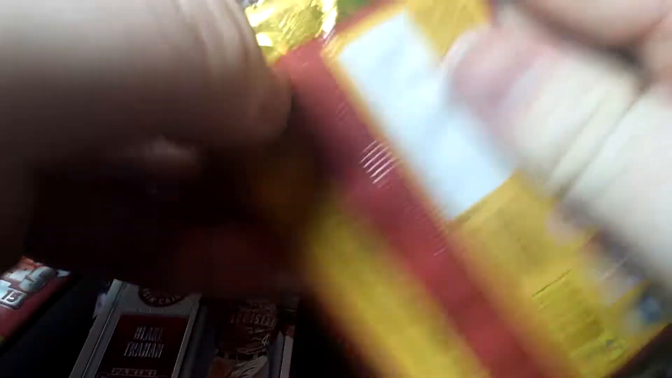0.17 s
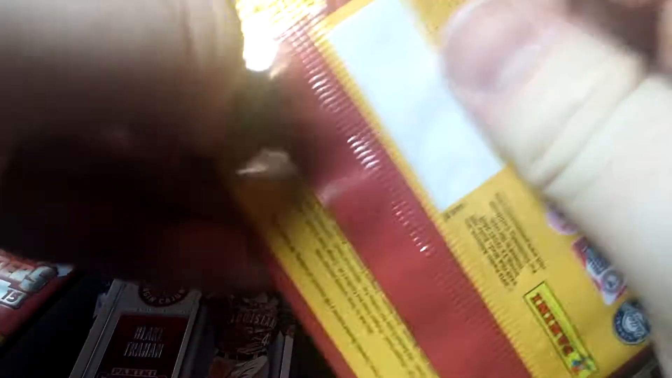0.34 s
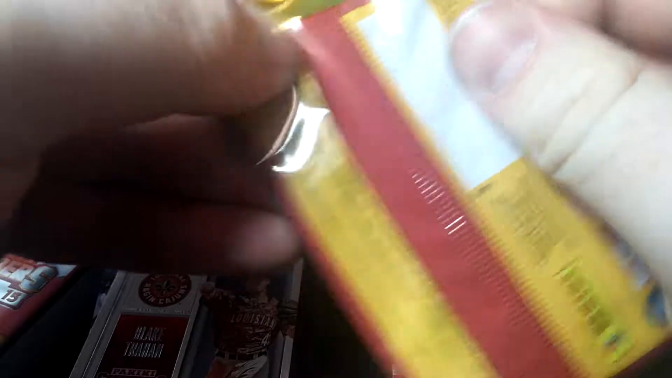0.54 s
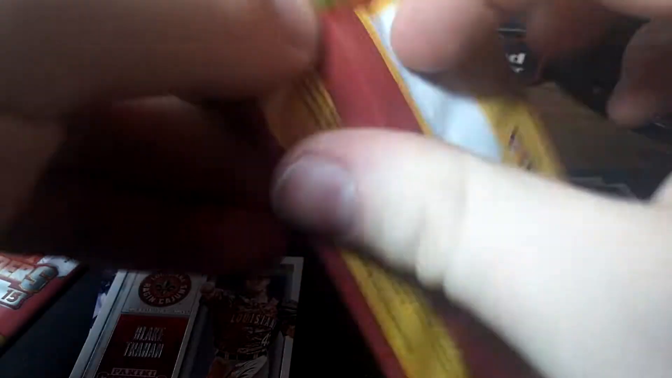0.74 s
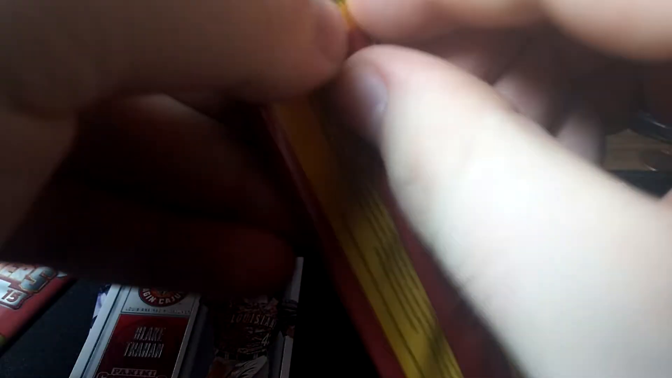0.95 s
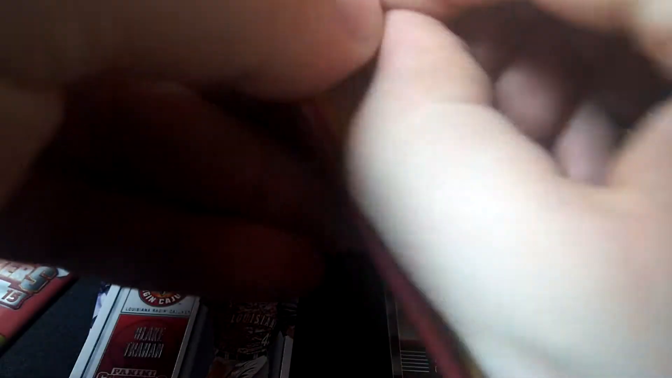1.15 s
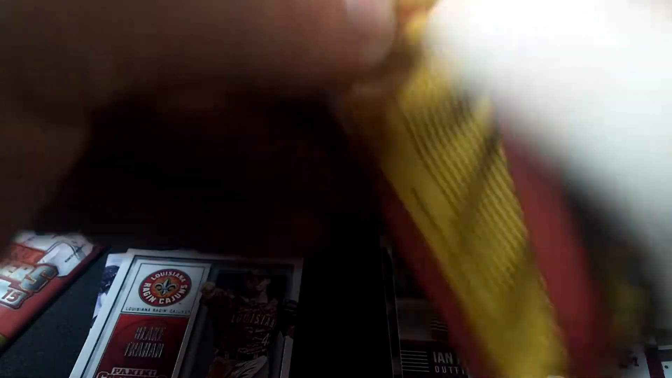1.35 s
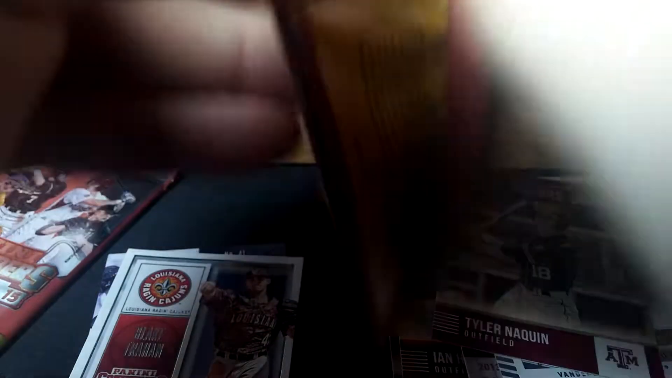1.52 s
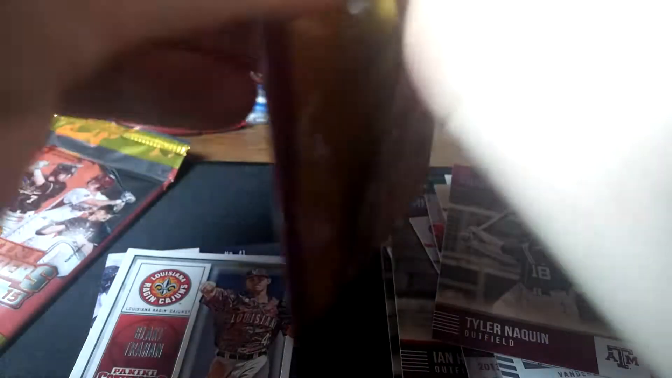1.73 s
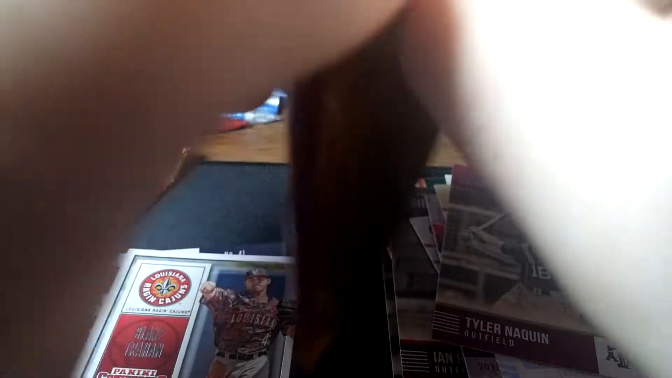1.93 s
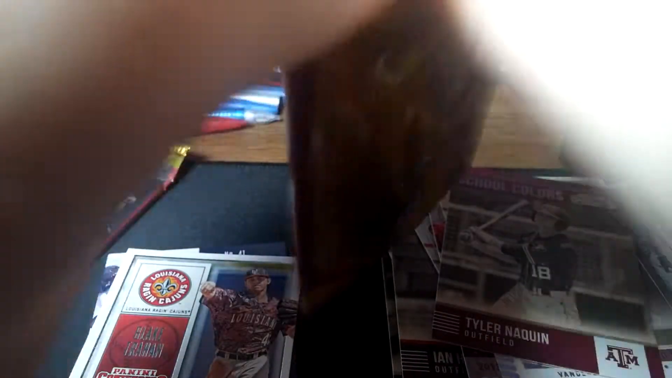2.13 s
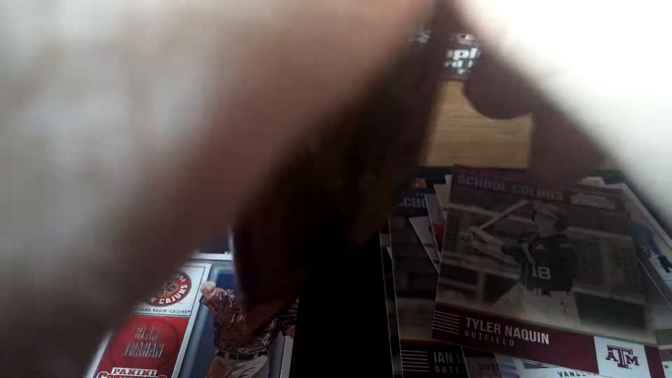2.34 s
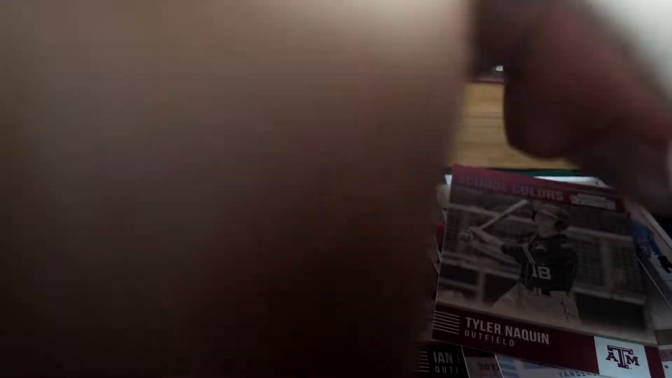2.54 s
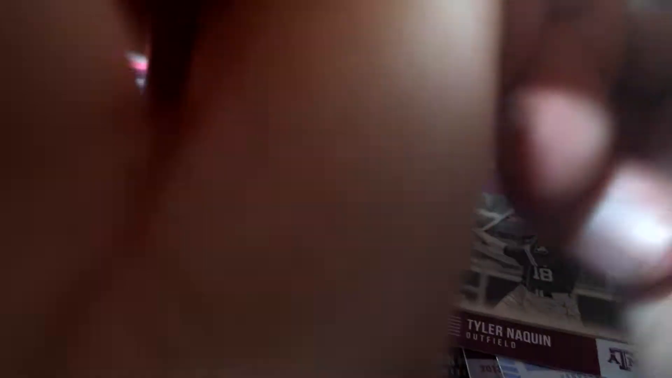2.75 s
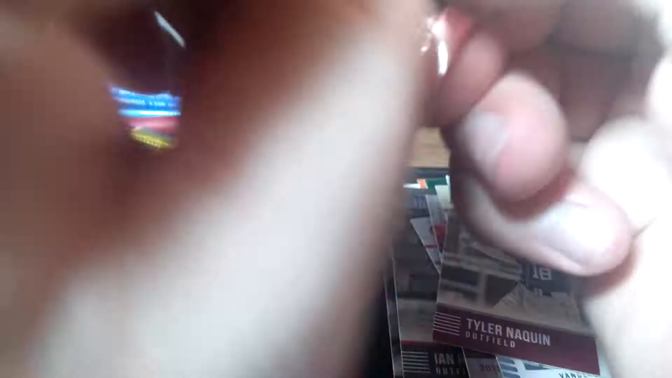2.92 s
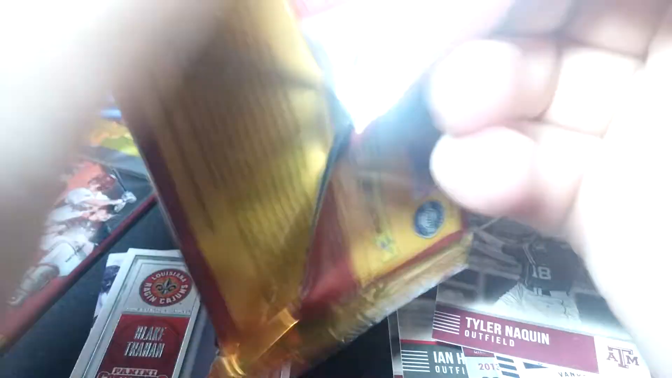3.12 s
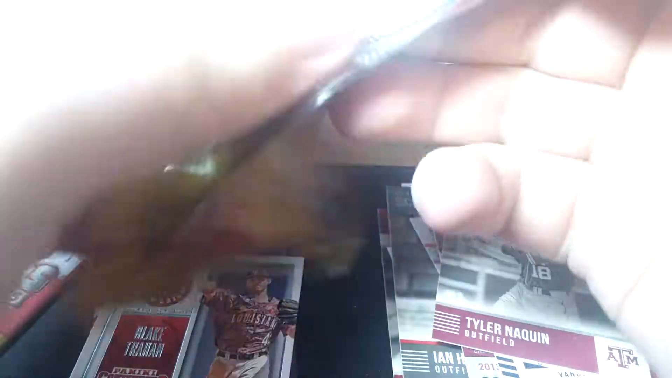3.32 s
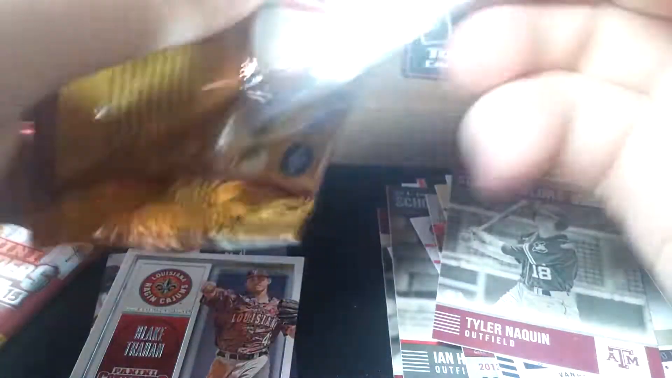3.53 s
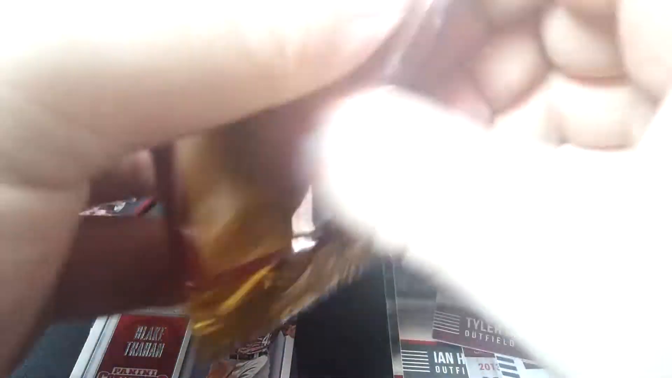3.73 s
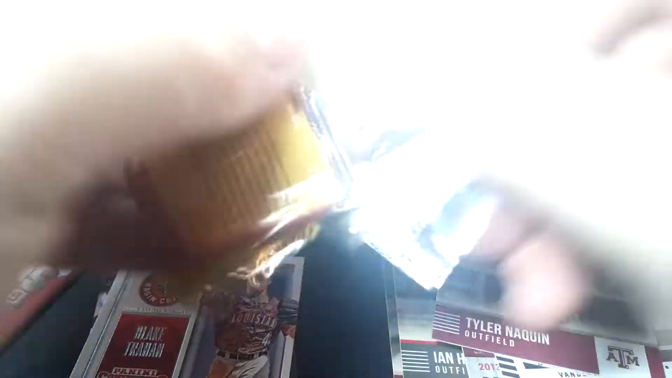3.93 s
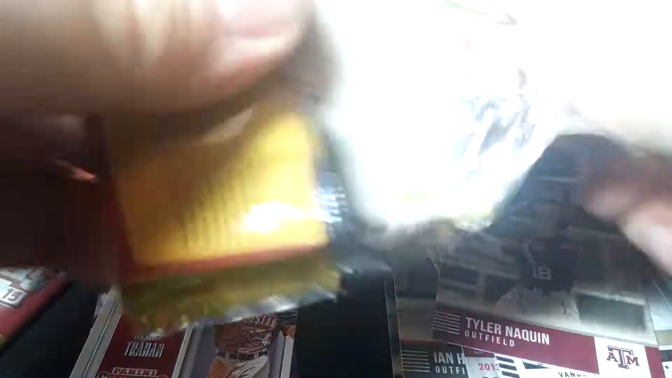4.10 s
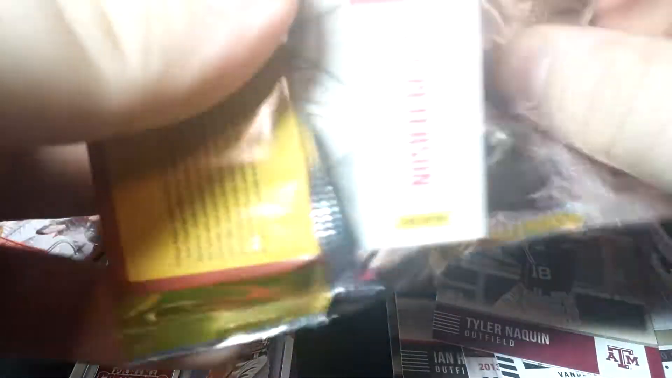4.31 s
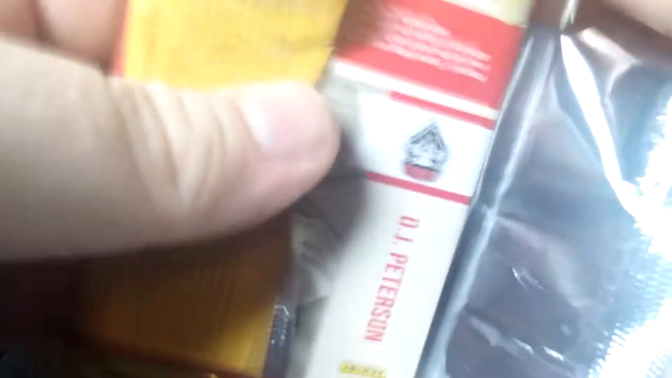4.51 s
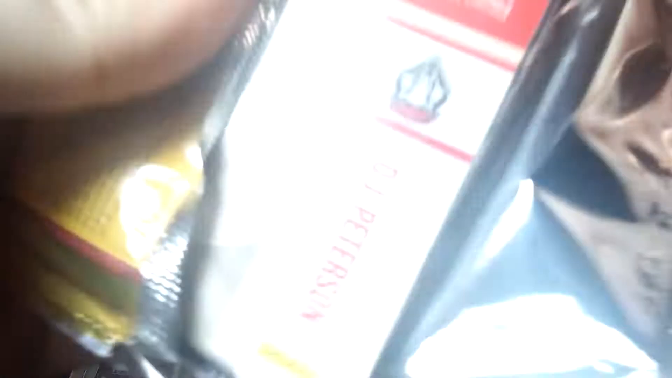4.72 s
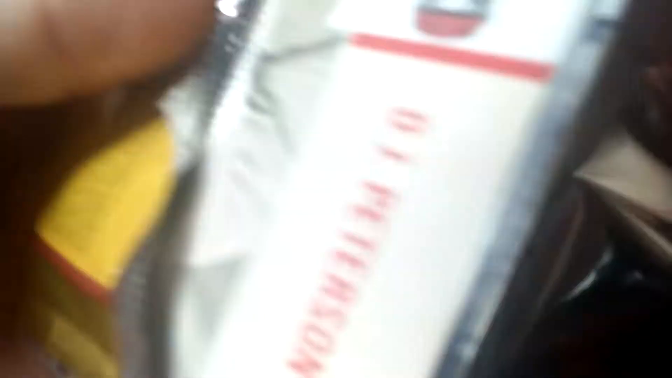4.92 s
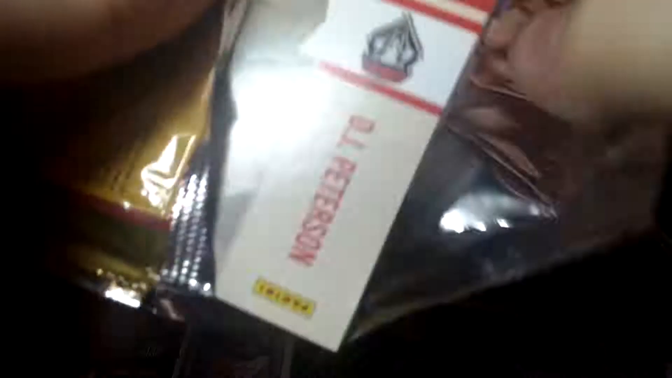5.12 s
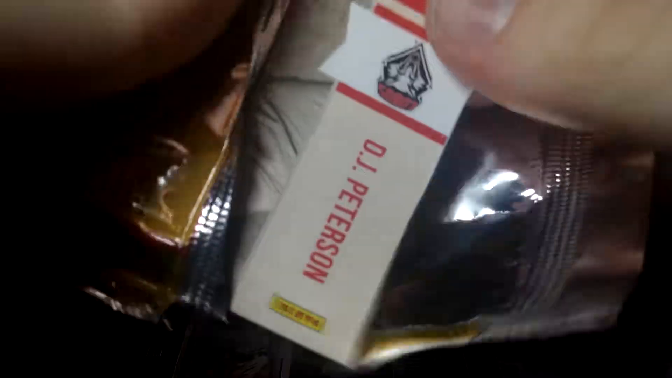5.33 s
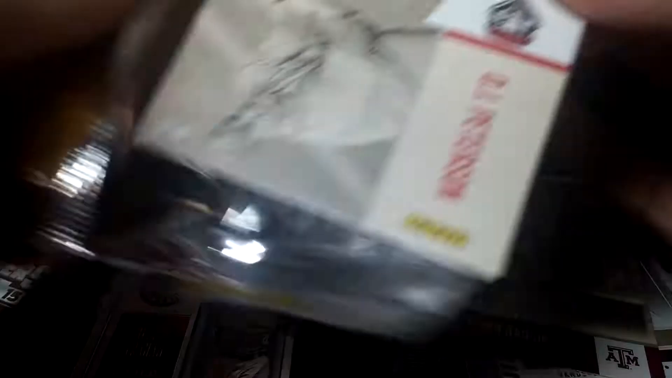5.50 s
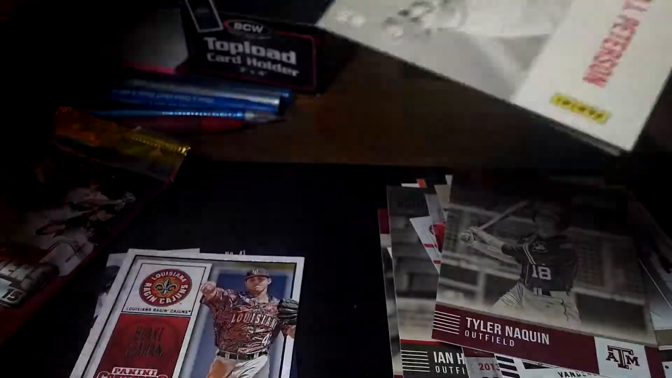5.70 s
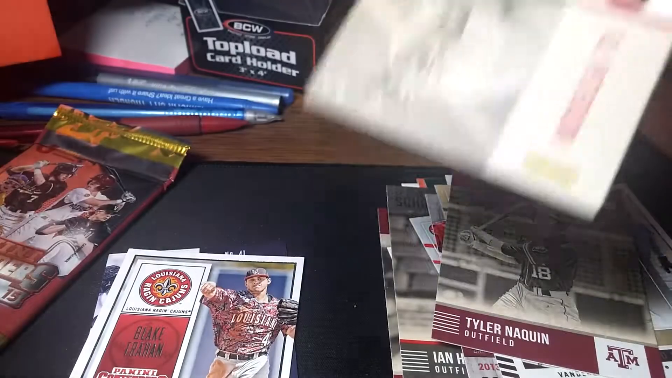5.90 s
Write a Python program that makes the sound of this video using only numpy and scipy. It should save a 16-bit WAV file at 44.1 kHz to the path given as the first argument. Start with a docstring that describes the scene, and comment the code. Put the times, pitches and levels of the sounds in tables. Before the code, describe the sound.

Close to the microphone, fingers pinch a foil card packet with single quiet ticks and thin rustle. Small rasps and dull bumps follow, a hard snap comes halfway, then a dense burst of ripping and crackling, loudest around four seconds. The open pouch sounds fuller as cards are worked out with low rubbing, then the foil quiets down in a small, fairly dry room with faint hum.

```python
"""A foil card pack is pinched, ripped open and peeled off its cards, close by, over a desk in a small room.
First come creases snapping singly (ringing noise bursts) and thin rustle (showers of tiny buckles).
From 1.3 s tears crowd the showers into a rasp; from 1.6 s fingers and cards bump the pack (low rings, thuds).
From 3.4 s the pouch gapes and booms; fingers drag hardest near 4.7 s (low noise), then the foil settles.
Sliding skin and card add rough noise in four strokes; shaped noise hums faintly as the room throughout."""
import sys
import numpy as np
from scipy import signal
from scipy.fft import rfft, irfft
from scipy.io import wavfile

SR = 44100
rng = np.random.default_rng(int(sys.argv[2]) if len(sys.argv) > 2 else 0)


def transcribe(u):
    """Save the signal u as a 16-bit wav file named by the first command-line argument.

    u: samples, shape (n,) or (channels, n), limited to [-1, 1]; the rate is SR.
    q: integer samples, one column per channel.
    """
    v = np.clip(np.atleast_2d(u).T, -1, 1)
    q = np.round(v * 32767).astype(np.int16)
    wavfile.write(sys.argv[1], SR, q)


N = 267111
TIME = np.arange(N) / SR

# loud buckles: start_s, crack_level_db, body_above_crack_db, fizz_above_crack_db, facet_ring_hz
SNAP_EVENTS = [(0.0146, -46, -22, 18, 4550), (0.138, -42, -10, 3.5, 5870.0), (0.2907, -46.5, -5, 5.5, 5540),
               (0.31, -41, -26, 9, 4350), (0.358, -52, -17, 3, 6000.0), (0.628, -38, -11.5, 2, 3750),
               (0.6734, -38, -4.5, 11.5, 5850.0), (0.711, -42, -9, 6, 4530),
               (0.8008, -38, -13.5, 10.5, 9500), (0.9872, -53, -8, 5, 3440), (1.0518, -53, 0, 6.5, 3870),
               (1.182, -56.5, 3, 20, 4720), (1.2387, -52, -12, 19.5, 3780), (1.2764, -41.5, -5, 8.5, 8600),
               (1.3102, -44, -5, 12, 3830), (1.3689, -31.5, -14, -3, 3950), (1.4244, -32, -18.5, 3, 3500),
               (1.4932, -40, -8.5, -2.5, 1980), (1.5772, -36.5, -12.5, -8.5, 3030),
               (1.6056, -28.5, -20, 2.5, 3340), (1.719, -46, -5, -2.5, 1740), (1.8084, -53, 1, 7, 6800),
               (1.9282, -41.5, -15, 3, 3530), (1.9594, -41, -8, 4.5, 9200), (2.001, -43, -13, 3, 4740.0),
               (2.0335, -47.5, -18, 14.5, 4730), (2.0811, -45, -17, 5, 6100), (2.1164, -50, -8, 7.5, 4370),
               (2.214, -46, -17, 10, 5400), (2.234, -43, -22, 2, 4550.0), (2.3114, -39.5, -15, 12, 6250),
               (2.368, -41.5, -13.5, -3, 3870.0), (2.4699, -36, -17, 10, 4300),
               (2.594, -37.5, -11, 4.5, 6640), (2.6242, -30, -11.5, 3, 6850),
               (2.7026, -36.5, -21, 3.5, 4480), (2.7972, -40.5, -7, 9, 4340),
               (2.8916, -17.5, -15.5, 0.5, 4070), (3.029, -32.5, -16, 7.5, 4700),
               (3.1134, -24, -11, -2, 2110), (3.1499, -31.5, -14, 6, 3240), (3.1815, -26, -10, 0, 1480),
               (3.2121, -20.5, -11.5, 0, 1840), (3.2555, -26, -24, -5, 2620),
               (3.3141, -35.5, 3, 1.5, 5880.0), (3.3792, -28, -2.5, 2.5, 6580), (3.4435, -35, -2, 14, 6300),
               (3.5098, -26, 1.5, 9.5, 5300), (3.536, -34, -12, 9, 4300), (3.5986, -34, -3, 4.5, 2800),
               (3.697, -37.5, -5, -8, 1460.0), (3.7256, -39.5, -3, 8.5, 5600), (3.7936, -34, -19, 6, 9850),
               (3.8161, -31, -11, 6, 4360), (3.953, -22, -7.5, -1.5, 2840), (3.9929, -27, -16, 6, 8690.0),
               (4.0567, -13, -16, -7, 1480), (4.06, -14, -9.5, -1, 1520), (4.082, -17, -4, -9, 1400),
               (4.148, -22.5, -14, -16, 2050), (4.1842, -27.5, -1.5, -6, 1430.0),
               (4.2136, -29, -4, 5.5, 4440), (4.2286, -26, -10, 4.5, 5100), (4.3003, -29.5, -4, -3.5, 1360),
               (4.3496, -34, -15, 2, 2000), (4.4862, -37.5, -12, 4, 7400),
               (4.5982, -18.5, -7.5, -4, 2190.0), (4.6958, -29, -5.5, -8, 2240),
               (4.703, -28, 2, -3.5, 2420), (4.7236, -27.5, -4, 0, 1370), (4.7867, -32.5, -2, -5, 1540.0),
               (4.8519, -35, -2, 5, 5320.0), (4.8689, -24, -6.5, 1.5, 3260), (4.9039, -31, -1.5, 1, 5980.0),
               (4.976, -36, -18, 8, 5550), (5.0005, -31.5, -7, 0.5, 1260), (5.0628, -33, 1, 4, 5560),
               (5.1505, -32.5, -9, -1, 1440), (5.1798, -26.5, -20, -15, 1940.0), (5.261, -44, 1, 3, 3800),
               (5.302, -39.5, 0, 3, 2520), (5.3918, -37, -4, -1, 1470), (5.5569, -36, 1, -3, 1810),
               (5.6414, -39, -3, 4.5, 2010), (5.7793, -56.5, -1, 17.5, 6100), (5.8022, -49, -22, 3.5, 2700),
               (5.965, -52, 2, 9.5, 2730)]
# seam tears: start_s, end_s, crack_level_db, fizz_above_crack_db, extra_ruptures_per_s (before clumping)
SEAM_RIPS = [(1.294, 1.44, -48.5, 14.5, 1660), (3.003, 3.042, -38, 9, 3500), (3.138, 3.241, -32.5, 5, 2300),
             (3.437, 3.525, -33, 8.5, 5800), (3.973, 4.091, -24, 1.5, 3700), (4.847, 4.896, -36, 7.5, 1900)]
# fingers flex the foil: start_s, end_s, crack_level_db, fizz_above_crack_db
FOIL_FLEXES = [(0.135, 0.155, -49.5, 7), (0.18, 0.23, -56.5, 7), (0.445, 0.505, -54.5, 12),
               (0.62, 0.725, -56, 14.5), (1.16, 1.21, -58, 10), (1.61, 1.66, -46.5, 4),
               (1.91, 1.97, -61.5, 14), (2.03, 2.1, -71.5, 20), (2.235, 2.29, -52, 14),
               (2.62, 2.645, -62, 21), (2.905, 2.945, -41, 9), (3.06, 3.12, -43.5, 7.5),
               (3.315, 3.39, -41, 5.5), (3.55, 3.655, -40, 4.5), (3.725, 3.77, -51, 13),
               (3.795, 3.83, -45, 12), (3.898, 3.92, -37, 1.5), (4.15, 4.25, -38.5, 2),
               (4.345, 4.42, -40, -4.5), (4.485, 4.51, -43, 1.5), (4.61, 4.65, -38, 3),
               (4.705, 4.745, -41.5, 3.5), (4.77, 4.8, -52, 8.5), (5.0, 5.05, -45.5, 1.5),
               (5.06, 5.19, -35.5, 0.5), (5.28, 5.32, -50, 2.5), (5.375, 5.405, -46.5, 1),
               (5.47, 5.53, -45, 2), (5.54, 5.6, -43.5, 2.5)]
# grip keeps the foil rustling between strokes: time_s, crack_level_db
GRIP_CURVE = [(0, -66), (0.4, -64), (0.74, -60.5), (0.92, -64), (1.11, -66), (1.28, -60), (1.5, -54.5),
              (1.72, -64.5), (1.87, -55), (2.18, -63), (2.3, -57), (2.88, -68), (2.96, -53), (3.87, -51.5),
              (4.12, -49.5), (4.48, -51.5), (4.57, -72), (4.66, -76), (4.97, -50), (5.34, -58), (5.43, -70),
              (5.57, -50.5), (5.8, -67), (6.05, -56)]
# fingertips, cards and torn edges slide along the pouch: start_s, end_s, level_db
SLIDE_STROKES = [(0.26, 0.736, -55.5), (3.18, 3.227, -35), (3.504, 3.67, -54), (5.924, 6.053, -59.5)]
# finger drag, strongest while the cards are worked out: time_s, level_re_body_db
DRAG_CURVE = [(3.9, -17.5), (4.15, -7), (4.7, -5), (5.7, -10.5)]
# fingers and cards bump the pack: start_s, ring_level_db, ring_hz
BUMP_EVENTS = [(1.643, -32, 658), (2.55, -39, 503), (2.895, -32, 139), (3.041, -25, 660),
               (3.283, -28.5, 660), (3.448, -26.5, 134), (3.455, -37, 221), (3.52, -17.5, 590),
               (4.081, -21, 366), (4.183, -28.5, 234), (4.245, -26.5, 370), (4.384, -28, 350),
               (4.424, -23.5, 262), (4.429, -28, 596), (4.601, -27, 187), (4.702, -26, 318),
               (4.728, -34, 252), (4.87, -24, 258), (4.903, -37, 174), (5.085, -29, 306),
               (5.562, -27.5, 184)]
# wrapper registers, in order body (whole pouch), crack (large facets), fizz (small facets): low_hz, high_hz
REGISTER_EDGES = [(300, 1000), (1000, 2800), (2800, 16500)]
# resonances of the pouch and the space round it: centre_hz, width_hz, lift_db
POUCH_MODES = [(353, 52, 10.5), (683, 140, 12.5), (1430, 193, 10), (1939, 270, 9), (4600, 460, -0.5),
               (9660, 2430, 7)]
# reflections off desk and hands: nominal_delay_s, gain
NEAR_ECHOES = [(.0018, 0.44), (0.0085, 0.049), (0.0239, 0.023)]
# spectrum of a buckle: freq_hz, relative_level_db
FOIL_SPECTRUM = [(30, -40), (110, -30.5), (220, -14.5), (900, -8), (2000, -12), (2500, -5.5), (3300, 2.5),
                 (6200, 1.5), (7500, -3.5), (10000, -7), (13000, -9.5), (16000, -10.5)]
# spectrum of rubbing fingers: freq_hz, relative_level_db
RUB_SPECTRUM = [(30, -34), (60, -13), (120, 1.5), (200, 8), (280, 7), (400, -44), (1000, -45)]
# spectrum of the room: freq_hz, relative_level_db
ROOM_SPECTRUM = [(25, -17), (40, -24), (60, -8.5), (90, -10), (127, 8.5), (160, -3.5), (250, 2.5),
                 (400, -12), (650, -7.5), (1000, -13.5), (1500, -52), (4500, -16), (10000, -35),
                 (16000, -37)]

# every flex, rip and slide swells and lets go at these rates
ATTACK_DB_PER_S, RELEASE_DB_PER_S = 1596, 532
# body against crack while closed, then its gain as the pouch gapes
CLOSED_BODY_DB, OPEN_BODY_DB = -9, 5
OPENS_S, OPENING_S = 3.37, 0.1
# fizz against crack at a firm grip; a lighter grip has relatively less fizz
FIRM_GRIP_DB, GRIP_FIZZ_DB, FIZZ_DB_PER_GRIP_DB = -50, 6.5, 0.18
CUTOFF_HZ = 16200


def snaps(head_s=0.008):
    """Loud buckles: a facet flips and rings; body, crack and fizz are levelled over the first head_s."""
    out = np.zeros((2, N + SR))
    head = int(head_s * SR)
    plateaus_hz = np.ravel(np.multiply(REGISTER_EDGES, [1.3, 0.9]))
    for start_s, crack_db, body_db, fizz_db, facet_hz in SNAP_EVENTS:
        flip = buckle(facet_hz, t60_s=0.018, facet_db=9.5, facet_width_hz=560)
        snap = wrapper(flip + chirp(facet_hz))
        own_db = [10 * np.log10(np.mean(register(snap[:, :head], edges) ** 2)) for edges in REGISTER_EDGES]
        weight_db = crack_db + np.array([body_db, 0, fizz_db]) - own_db
        snap = colour(snap, list(zip(plateaus_hz, np.repeat(weight_db, 2))))
        at = max(0, int(start_s * SR))
        out[:, at:at + snap.shape[1]] += snap
    return out[:, :N]


def buckle(facet_hz, t60_s, facet_db, facet_width_hz, flip_s=0.0013, rise_s=0.00018):
    """A facet flips over in flip_s, then the sheet flutters out with the facet's ring."""
    t = TIME[:2048]
    decay = from_db(-60 * np.maximum(t - flip_s, 0) / t60_s)
    shape = (1 - np.exp(-t / rise_s)) * decay
    return resonate(two_ports(len(t)) * shape, facet_hz, facet_width_hz, facet_db)


def chirp(facet_hz, chirp_db=-12, t60_s=0.022, rise_fraction=0.21, taut_s=0.006):
    """The freed facet pulls taut, so its ring sweeps upwards as it dies."""
    t = TIME[:2048]
    hz = facet_hz * (1 + rise_fraction * (0.5 - np.exp(-t / taut_s)))
    phase = 2 * np.pi * (np.cumsum(hz) / SR + rng.random((2, 1)))
    return from_db(chirp_db - 60 * t / t60_s) * np.sin(phase)


def wrapper(x):
    """Foil colours the sound, the pouch resonates, desk and hands reflect."""
    x = colour(x, FOIL_SPECTRUM)
    for centre_hz, width_hz, lift_db in POUCH_MODES:
        x = resonate(x, centre_hz, width_hz, lift_db)
    out = x.copy()
    for delay_s, gain in NEAR_ECHOES:
        lag = max(1, int(delay_s * rng.uniform(0.85, 1.15) * SR))
        out[:, lag:] += gain * x[:, :-lag]
    return out


def crinkle(levels_db, facet_count=16, even_s=0.023):
    """Small buckles of all sizes come in clumps over the hiss of sliding foil; tearing crowds them."""
    clicks = ruptures()
    dealt = rng.integers(0, facet_count, N)  # each rupture goes to one facet
    shower = 0
    for k, facet_hz in enumerate(np.geomspace(1500, 10000, facet_count)):
        flip = buckle(facet_hz, t60_s=0.016, facet_db=6.5, facet_width_hz=530, flip_s=0.000098)
        facet = rms_one(wrapper(flip))
        shower = shower + convolve((clicks * (dealt == k))[None], facet)
    quiet_db = np.clip(-24.5 - levels_db[2], 0, 22)  # how far the fizz lies below its strongest
    shower = rms_one(shower) + foil_hiss(quiet_db)
    window = signal.windows.hann(int(even_s * SR))
    out = 0
    for edges, level_db in zip(REGISTER_EDGES, levels_db):
        part = register(shower, edges)
        power = signal.oaconvolve(np.mean(part ** 2, 0), window / window.sum(), "same")
        evened = part / np.sqrt(np.abs(power) + 1e-9)
        out = out + from_db(level_db) * evened  # the hands set the strength
    return soften_quiet_treble(out, quiet_db)


def ruptures(base_per_s=460, spread_db=6, clump_db=4):
    """Random clicks of either sign and exponential dB spread; rips and slow drift crowd them."""
    rate_per_s = base_per_s
    for start_s, end_s, _, _, extra_per_s in SEAM_RIPS:
        rate_per_s = rate_per_s + extra_per_s * ((TIME > start_s) & (TIME < end_s))
    born = rng.random(N) < rate_per_s * from_db(clump_db * drift(70)) / SR
    size_db = spread_db * np.minimum(rng.exponential(1, N), 4.5)
    return born * from_db(size_db) * rng.choice([-1, 1], N)


def foil_hiss(quiet_db, hiss_db=-22, slip_db=9.5, gentle_db_per_db=0.6):
    """Sliding foil sticks and slips; a light grip slides more than it buckles."""
    hiss = rms_one(wrapper(two_ports(N) * from_db(slip_db * drift(270))))
    return from_db(hiss_db + gentle_db_per_db * quiet_db) * hiss


def soften_quiet_treble(x, quiet_db, soften_db_per_db=0.08, split_hz=7000):
    """The quieter the rustle, the weaker its treble above split_hz."""
    soft = signal.sosfiltfilt(signal.butter(2, split_hz, fs=SR, output="sos"), x)
    return soft + from_db(-soften_db_per_db * quiet_db) * (x - soft)


def handling():
    """Body, crack and fizz levels of the shower (dB): powers of grip, flexes and rips add."""
    t = TIME[::40]
    grip_db = np.interp(t, *np.transpose(GRIP_CURVE))
    grip_fizz_db = GRIP_FIZZ_DB + FIZZ_DB_PER_GRIP_DB * (grip_db - FIRM_GRIP_DB)
    crack = from_db(grip_db) ** 2
    fizz = crack * from_db(grip_fizz_db) ** 2
    for start_s, end_s, level_db, fizz_db, *_ in list(FOIL_FLEXES) + list(SEAM_RIPS):
        power = from_db(level_db + stroke_db(t, start_s, end_s)) ** 2
        crack = crack + power
        fizz = fizz + power * from_db(fizz_db) ** 2
    crack_db = np.interp(TIME, t, 10 * np.log10(crack))
    fizz_db = np.interp(TIME, t, 10 * np.log10(fizz))
    body_db = crack_db + CLOSED_BODY_DB + opening_db(TIME)
    return [body_db, crack_db, fizz_db]


def stroke_db(t, start_s, end_s):
    """One movement of the hands swells, holds at 0 dB and lets go."""
    attack_db = -ATTACK_DB_PER_S * np.maximum(start_s - t, 0)
    release_db = -RELEASE_DB_PER_S * np.maximum(t - end_s, 0)
    return attack_db + release_db


def opening_db(t):
    """The pouch gains body as it gapes."""
    return OPEN_BODY_DB * np.clip((t - OPENS_S) / OPENING_S, 0, 1)


def bumps(t60_s=0.036, rise_s=0.0017, thud_db=-4):
    """Soft contacts: a short low ring and a dull noise thud."""
    out = np.zeros((2, N + SR))
    t = TIME[:SR // 8]
    for start_s, level_db, ring_hz in BUMP_EVENTS:
        thud = rms_one(band(two_ports(len(t)), ring_hz / 2, ring_hz * 2))
        ring = np.sin(2 * np.pi * ring_hz * t)
        shape = from_db(level_db - 60 * t / t60_s) * (1 - np.exp(-t / rise_s))
        at = int(start_s * SR)
        out[:, at:at + len(t)] += shape * (ring + from_db(thud_db) * thud)
    return band(out[:, :N], 85, 3100)


def rubbing(body_db, rough_db=3):
    """Fingers dragging on the stiff pack rumble in step with the pouch."""
    drag_db = np.interp(TIME, *np.transpose(DRAG_CURVE))
    rumble = rms_one(colour(two_ports(N), RUB_SPECTRUM))
    return from_db(body_db + drag_db + rough_db * drift(50)) * rumble


def sliding(low_hz=580, high_hz=2300, rough_db=4):
    """Skin and card stick and slip on the foil, stirring the pouch's low resonances."""
    level = 0
    for start_s, end_s, level_db in SLIDE_STROKES:
        level = level + from_db(level_db + np.maximum(stroke_db(TIME, start_s, end_s), -80))
    friction = two_ports(N) * from_db(rough_db * drift(90))
    return level * rms_one(band(wrapper(friction), low_hz, high_hz))


def room(x, wet_db=-17.5, treble_db=-4, t60_s=0.26, treble_t60_s=0.17, build_s=0.008):
    """A short diffuse tail of decaying noise whose treble dies first."""
    t = TIME[:SR // 2]
    noise = two_ports(len(t)) * (1 - np.exp(-(t / build_s) ** 2))
    low = band(noise, 120, 5500) * from_db(-60 * t / t60_s)
    high = band(noise, 5500, 16000) * from_db(treble_db - 60 * t / treble_t60_s)
    tail = rms_one(low - high) / np.sqrt(len(t))
    return x + from_db(wet_db) * convolve(x, tail)


def ports(x, bass_left_db=2.0, treble_left_db=-0.72, split_hz=2000, right_lag_samples=3):
    """The pack is nearer the left port, heard first and fuller; the foil's treble beams to the right."""
    bass = signal.lfilter(*signal.butter(1, split_hz, fs=SR), x)
    treble = x - bass
    sides = np.array([[1], [-1]])
    left, right = bass * from_db(bass_left_db * sides) + treble * from_db(treble_left_db * sides)
    return np.array([left, np.pad(right, (right_lag_samples, 0))[:N]])


def room_hum(level_db=-56.5):
    """The room's steady hum: noise in its own spectrum."""
    return from_db(level_db) * rms_one(colour(two_ports(N), ROOM_SPECTRUM))


def two_ports(size, alike_hz=2400, bass_apart=0.26):
    """Stereo noise as two spaced ports hear it: long waves alike, short ones unrelated."""
    mid, side = rfft(rng.standard_normal((2, size)))
    hz = np.arange(len(mid)) * SR / size
    apart = np.clip(bass_apart + (hz / alike_hz) ** 2 / 2, 0, 1)
    return irfft((mid + apart * side * [[1], [-1]]) / np.sqrt(1 + apart ** 2), size)


def drift(knots_per_s):
    """Smooth random curve of rms 1."""
    knots = rng.standard_normal(int(N / SR * knots_per_s) + 2)
    return rms_one(np.interp(TIME * knots_per_s, np.arange(len(knots)), knots))


def register(x, edges_hz):
    """One register; a twice-applied band-pass joins its neighbours without a notch."""
    return band(band(x, *edges_hz), *edges_hz)


def band(x, low_hz, high_hz):
    """Band-pass."""
    return signal.sosfilt(signal.butter(2, [low_hz, high_hz], "band", fs=SR, output="sos"), x)


def resonate(x, hz, width_hz, lift_db):
    """Lift one resonance out of the sound."""
    peak = signal.lfilter(*signal.iirpeak(hz, hz / width_hz, fs=SR), x)
    return x + (from_db(lift_db) - 1) * peak


def colour(x, spectrum):
    """Causal (minimum-phase) filter with the given spectrum, by folding its cepstrum."""
    size = 8192
    hz, db = np.transpose(spectrum)
    grid_hz = np.maximum(np.arange(size // 2 + 1) * SR / size, 1)
    gain = from_db(np.interp(np.log(grid_hz), np.log(hz), db))
    cepstrum = irfft(np.log(gain))
    cepstrum[1:size // 2] *= 2
    cepstrum[size // 2 + 1:] = 0
    return convolve(x, irfft(np.exp(rfft(cepstrum)))[None])


def convolve(x, response):
    """Pass through an impulse response, keeping the length."""
    return signal.oaconvolve(x, response, axes=-1)[:, :x.shape[-1]]


def rms_one(x):
    """Scale to rms 1."""
    return x / np.sqrt(np.mean(x ** 2) + 1e-20)


def from_db(db):
    """Decibels to gain."""
    return 10 ** (np.asarray(db) / 20)


def scene():
    """Wrapper and hands in the room, over its steady hum."""
    levels_db = handling()
    foil = snaps() + crinkle(levels_db)
    hands = bumps() + rubbing(levels_db[0]) + sliding()
    return ports(room(foil + hands)) + room_hum()


def record(dry, top=1.1):
    """The highest peaks are rounded, then a steep low-pass cuts the top."""
    low_pass = signal.cheby1(14, 0.2, CUTOFF_HZ, fs=SR, output="sos")
    return signal.sosfilt(low_pass, top * np.tanh(dry / top))


dry = scene()
out = record(dry)
transcribe(out)
```